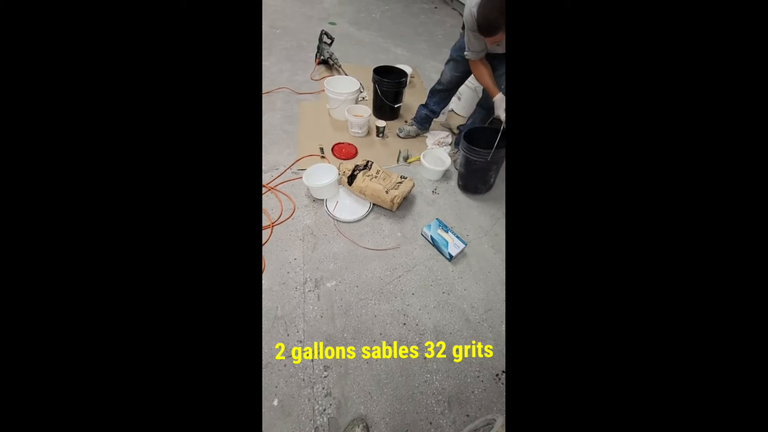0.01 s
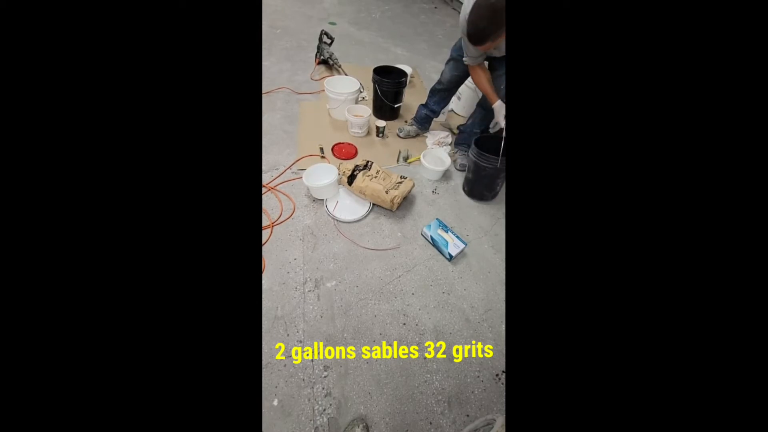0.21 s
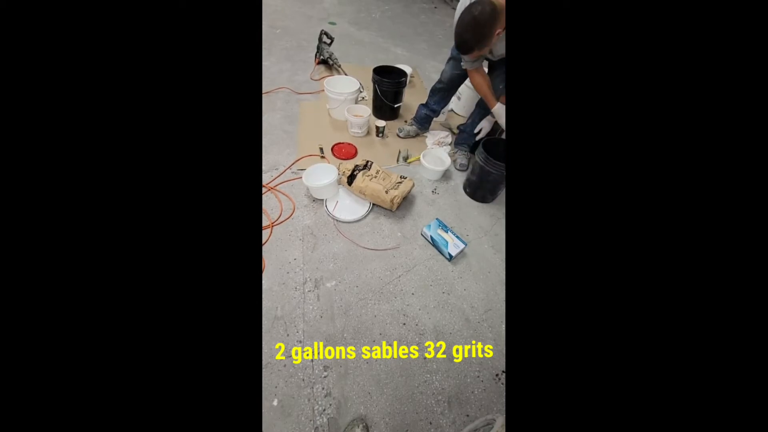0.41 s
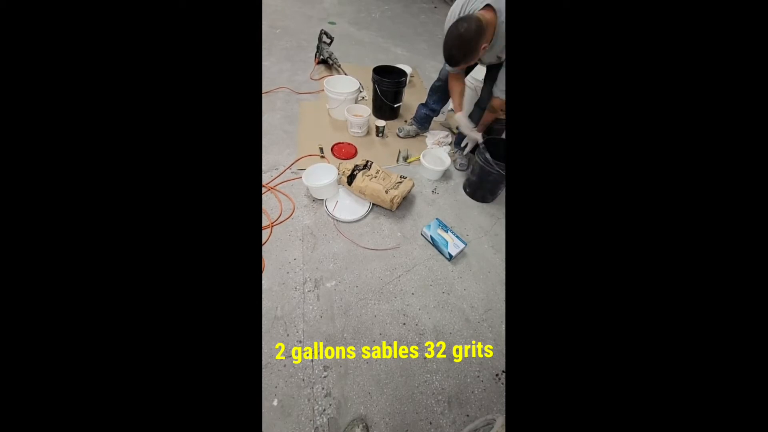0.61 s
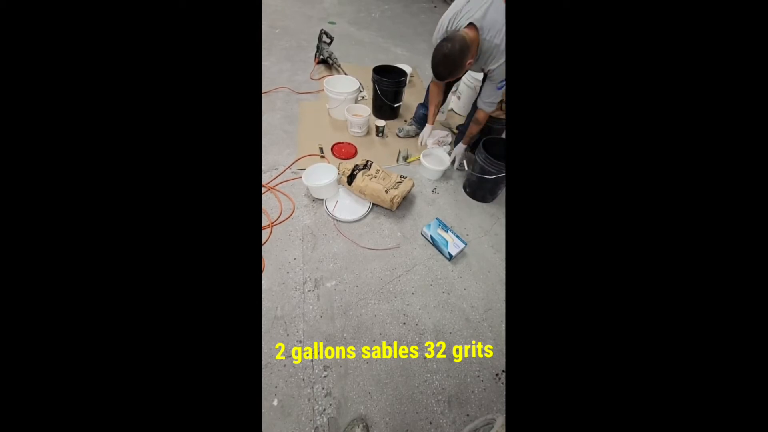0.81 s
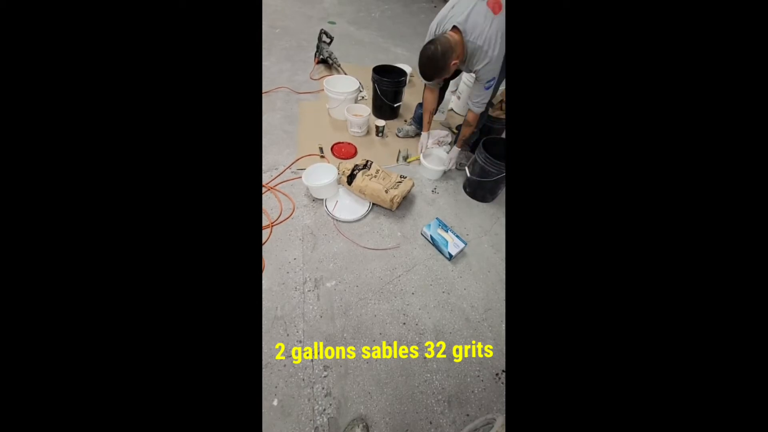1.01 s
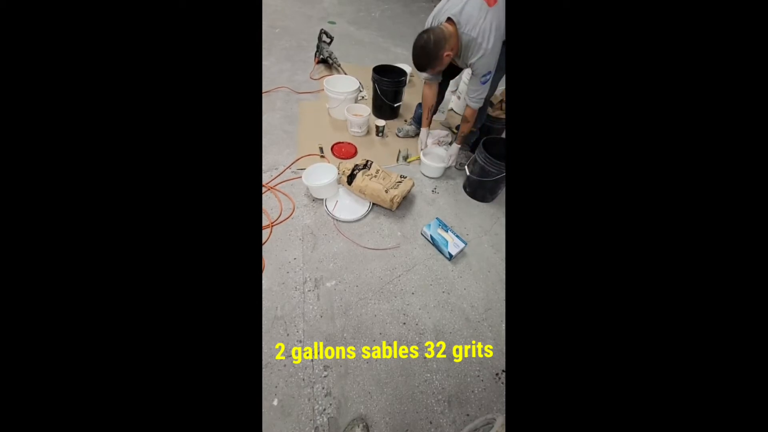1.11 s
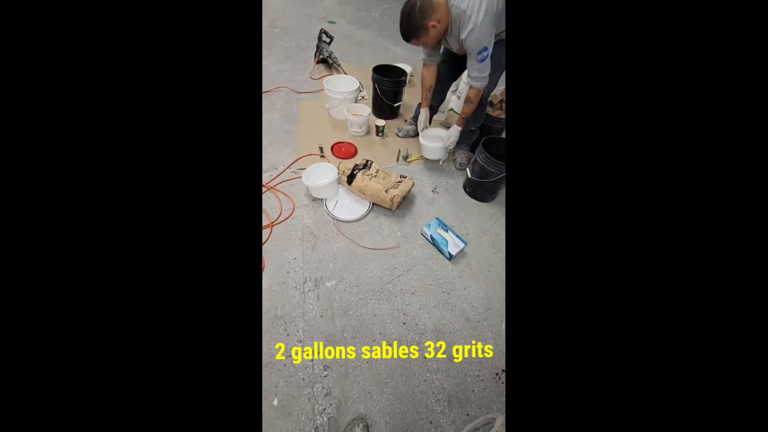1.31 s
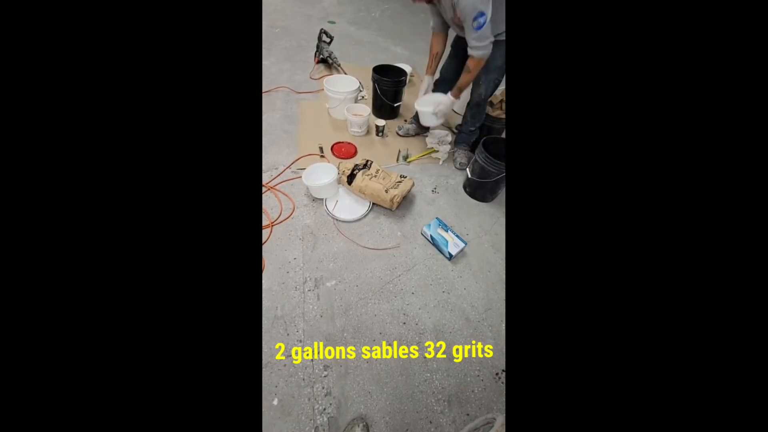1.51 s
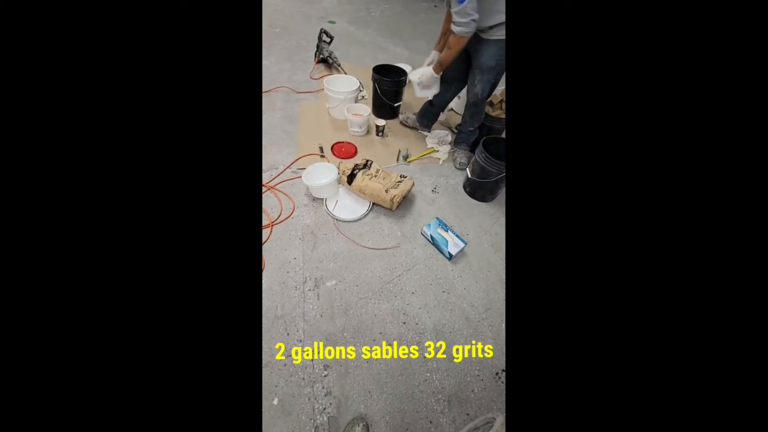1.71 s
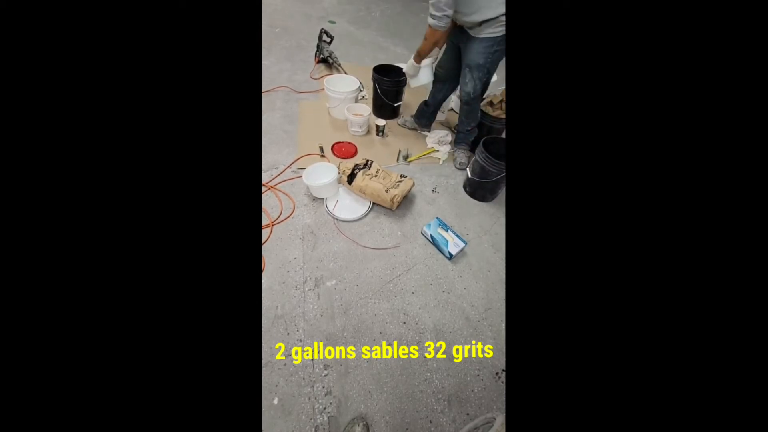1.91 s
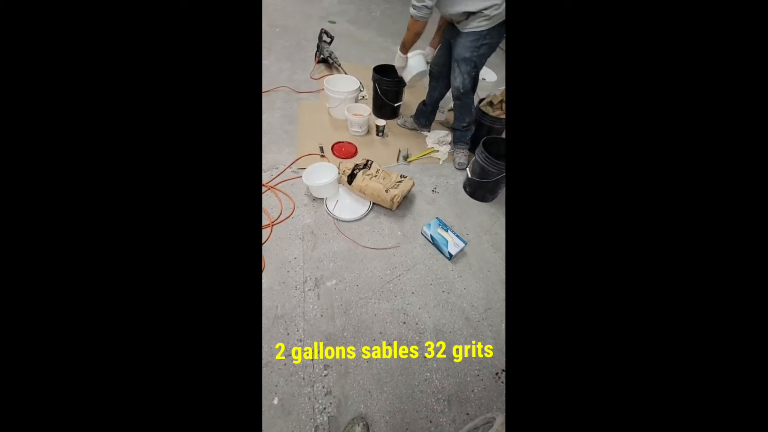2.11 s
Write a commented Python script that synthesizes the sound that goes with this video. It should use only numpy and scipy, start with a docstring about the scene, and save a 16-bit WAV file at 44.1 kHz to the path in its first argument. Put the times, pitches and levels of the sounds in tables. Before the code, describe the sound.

Plastic buckets knock and clack sharply on a concrete floor in an echoing bare workshop

```python
"""Buckets in an echoing workshop

Plastic buckets are handled on the concrete floor of a bare workshop. One is set down: decaying sine booms under
a rattle of shaped noise, with softer knocks as it rocks. Sharp clacks, as of a handle on a bucket wall, layer
noise bursts with ringing modes. A sandy rustle of filtered noise and soft step bursts follow, as of a tub
carried off. Echoes, lingering tub modes and a diffuse tail surround the impacts; steady low noise is the still
air."""
import sys
import numpy as np
from scipy import signal
from scipy.fft import rfft, irfft
from scipy.io import wavfile
from scipy.ndimage import uniform_filter1d, minimum_filter1d

SR = 44100
rng = np.random.default_rng(int(sys.argv[2]) if len(sys.argv) > 2 else 0)


def generate_wav(sig):
    """Save sig (samples, or channels by samples) to the path in sys.argv[1] as 16-bit PCM at SR."""
    pcm = np.round(np.clip(np.atleast_2d(sig).T, -1, 1) * 32767).astype(np.int16)
    wavfile.write(sys.argv[1], SR, pcm)


N = 97020  # samples, 2.2 s

# bucket meets floor: start_s, boom_db, pitch_hz, swell_s, wall_rattle_db
THUMPS = [(0.2132, -3.5, 233.5, 0.021, 16.5), (0.3713, -12.5, 225, .014, 6.5),
          (0.4590, -13, 212, 0.019, 10.5)]
# colour of the rattling bucket wall: freq_hz, level_db
WALL_COLOUR = [(40, -25.5), (100, -10.5), (170, 6.5), (290, 15), (400, 8), (650, 0), (1120, 4.5),
               (1600, -6.5), (2200, -17), (2900, -31.5), (6500, -34), (10000, -42), (15000, -34.5)]
BOOM_FALL_S, BOOM_ROOM_DB, BOOM_PAN_DB, BOOM_LAG_S = 0.002, -4, 1, -0.0001
PUSH_HZ, PUSH_DB, PUSH_PEAK_S = 93.3, -33.5, 0.018
WALL_FALL_S, WALL_RISE_S, WALL_ROOM_DB = 0.011, 0.00022, 0.5
THUMP_RIGHT_DB = 0.9  # right up, left down by this much


def thumps():
    """The bucket's bottom booms as it settles, its wall rattles, and it pushes air along the floor."""
    out = np.zeros((2, N))
    t = np.arange(SR // 5) / SR
    for start_s, boom_db, pitch_hz, swell_s, wall_db in THUMPS:
        swell = np.minimum(t / swell_s, 1)
        fall = np.exp(-np.maximum(t - swell_s, 0) / BOOM_FALL_S)
        boom = amp(boom_db) * swell * fall * np.sin(2 * np.pi * pitch_hz * t)
        push_shape = t / PUSH_PEAK_S * np.exp(1 - t / PUSH_PEAK_S)
        push = amp(PUSH_DB) * push_shape * np.sin(2 * np.pi * PUSH_HZ * t)
        rattle = amp(wall_db) * coloured(crunch(WALL_FALL_S, WALL_RISE_S), WALL_COLOUR)
        low = placed(boom + push, room_db=BOOM_ROOM_DB, pan_db=BOOM_PAN_DB, lag_s=BOOM_LAG_S)
        add(out, start_s, low)
        add(out, start_s, placed(rattle, room_db=WALL_ROOM_DB))
    return out * amp([[-THUMP_RIGHT_DB], [THUMP_RIGHT_DB]])


# handle clacks: start_s, body_db, hollow_db, ring_db, tick_db, fall_s, rise_s
CLACKS = [(0.37, -18, -15, -35, -9.5, 0.024, 0.0066), (0.408, -15, -13, -29, -9, .03, 0.03),
          (0.4696, 6, 8.5, -7, 7, 0.0057, 0.00059), (0.7896, 22, 16, 10.5, 20, 0.00167, 0.0012),
          (1.0759, 16.5, 8, -0.5, 14.5, 0.0047, .001), (1.2403, 6.5, 10.5, -17, 3.5, 0.0036, 0.00088),
          (1.3293, -2.5, 7, -22, -4.5, 0.0025, .0006), (1.58, -27, -11, -35, -17, 0.013, .003)]
# dull body of a clack: freq_hz, level_db
BODY_COLOUR = [(40, -36), (130, -2.5), (250, -2), (550, -0.5), (850, 3), (1280, 6), (1800, -3),
               (2400, -3.5), (3300, -5.5), (4200, -18), (15000, -57)]
# hollow voice of the plastic tub: freq_hz, level_db
HOLLOW_COLOUR = [(100, -41), (600, -16), (850, -5), (1120, 1.5), (1350, 2), (1580, 1.5), (1900, -14.5),
                 (4000, -41)]
# bright tick of a clack: freq_hz, level_db
TICK_COLOUR = [(100, -33), (2000, -4), (4000, -12), (6300, -13.5), (8000, -15.5), (10500, -17.5),
               (13000, -14.5), (15000, -21), (16000, -36)]
# ringing modes of the handle: freq_hz, level_db, t60_s
RING_MODES = [(2562, -37, 0.09), (2792, -9.5, 0.011), (2904, -15, 0.037), (2975, -20, 0.017),
              (3270, -69, 0.0083)]
BODY_DIRECT_DB, RING_DIRECT_DB, TICK_DIRECT_DB = -10, -15, -5.5
BODY_ECHO_DB, RING_ECHO_DB, TICK_ECHO_DB = -7.5, -6.5, -16.5
RING_ROOM_DB, RING_RISE_S, TICK_PAN_DB = -2.5, 0.0013, 3.5


def clacks():
    """Each clack is a bright tick, a hollow knock of plastic, a brief handle ring and lingering modes of the
    tub."""
    out = np.zeros((2, N))
    t = np.arange(SR // 10) / SR
    for start_s, body_db, hollow_db, ring_db, tick_db, fall_s, rise_s in CLACKS:
        dull = amp(body_db) * coloured(crunch(fall_s, rise_s), BODY_COLOUR)
        hollow = amp(hollow_db) * coloured(crunch(fall_s, rise_s), HOLLOW_COLOUR)
        tick = amp(tick_db) * coloured(crunch(fall_s, rise_s), TICK_COLOUR)
        ring = amp(ring_db) * modes(t, RING_MODES) * np.minimum(t / RING_RISE_S, 1)
        add(out, start_s, placed(dull + hollow, BODY_DIRECT_DB, echo_db=BODY_ECHO_DB))
        add(out, start_s, amp(hollow_db) * tub_linger())
        add(out, start_s, placed(ring, RING_DIRECT_DB, RING_ROOM_DB, RING_ECHO_DB))
        add(out, start_s, placed(tick, TICK_DIRECT_DB, echo_db=TICK_ECHO_DB, pan_db=TICK_PAN_DB))
    return out


# lingering modes of the plastic tub: freq_hz, level_db, t60_s
TUB_MODES = [(995, -55.5, 1), (1090, -52, .9), (1222, -59, .9), (1280, -53, 1), (1420, -55, 0.68),
             (1450, -65, 0.83), (2020, -71, .7), (2530, -59.5, 0.56), (3040, -51, 0.23), (3060, -62, 0.63)]
TUB_MODE_RISE_S = 0.011


def tub_linger():
    """The tub's faint lingering modes, reaching each channel with their own phase."""
    t = np.arange(SR) / SR
    return modes(t, TUB_MODES, random_phase=True) * np.minimum(t / TUB_MODE_RISE_S, 1)


def modes(t, table, random_phase=False):
    """Sum of decaying sines, each falling 60 dB in its t60; random phases make it two-channel."""
    total = 0
    for hz, db, t60_s in table:
        cycles = rng.random((2, 1)) if random_phase else 0
        decay = np.exp(-np.log(1000) * t / t60_s)
        total = total + amp(db) * decay * np.sin(2 * np.pi * (hz * t + cycles))
    return total


# soft steps and scuffs: start_s, level_db, fall_s
STEPS = [(1.926, -3.5, 0.0098), (1.951, -5.5, 0.038), (2.011, -12, 0.038)]
# colour of shoe on concrete: freq_hz, level_db
STEP_COLOUR = [(50, -14.5), (130, -4.5), (230, 11), (400, 4), (650, 1.5), (1100, -9), (1600, -21.5),
               (2500, -30), (7000, -32.5), (15000, -36.5)]
STEP_ROOM_DB, STEP_RISE_S = -3, 0.00053


def steps():
    """A shoe lands softly on concrete and scuffs: short bursts of dull noise."""
    out = np.zeros((2, N))
    for start_s, level_db, fall_s in STEPS:
        step = amp(level_db) * coloured(crunch(fall_s, STEP_RISE_S), STEP_COLOUR)
        add(out, start_s, placed(step, room_db=STEP_ROOM_DB))
    return out


# loudness curve of the sandy rustle: time_s, level_db
RUSTLE_LEVEL = [(0, -60), (.04, -61.5), (0.138, -78.5), (1.5, -83.5), (1.618, -61.5), (1.71, -56),
                (1.801, -63), (1.9, -68), (1.971, -65.5), (2.08, -65.5), (2.2, -64)]
# colour of the rustle: freq_hz, level_db
RUSTLE_COLOUR = [(200, -3.5), (900, -1), (2500, -0.5), (5500, -4), (9000, -10.5), (13500, -9.5),
                 (15500, -8)]


def rustle():
    """Faint dry hiss of sand and cloth shifting: noise riding a level curve."""
    level_db = np.interp(np.arange(N) / SR, *np.transpose(RUSTLE_LEVEL))
    return noise(RUSTLE_COLOUR, 400) * amp(level_db)


# colour of the workshop's still air: freq_hz, level_db
AIR_COLOUR = [(20, -12.5), (45, -10), (70, -1.5), (120, -3.5), (170, -14), (235, -1), (300, -10.5),
              (550, -11), (900, -18), (1400, -23), (2800, -29.5), (7000, -41.5), (15000, -48.5)]
AIR_DB = -51.5


def still_air():
    """Steady, mostly low noise of the workshop's air."""
    return amp(AIR_DB) * noise(AIR_COLOUR, 450)


# workshop reverberation: freq_hz, t60_s
ROOM = [(80, 0.85), (230, 1.25), (500, 1.35), (1200, 0.97), (2900, 0.97), (5000, 0.82), (8000, 0.57),
        (14000, 0.42)]
ROOM_GAP_S, ROOM_BUILD_S = 0.00067, 0.0085


def tail():
    """Diffuse two-channel reverberation of unit energy in the left channel, its bass nearly mono."""
    hz, t, z = signal.stft(rng.standard_normal((2, 3 * SR // 2)), SR, nperseg=512)
    # share of the left channel's noise in the right, by frequency
    same = np.clip(read([(150, 1.0), (280, 0.78), (500, 0)], hz), 0, 1)[:, None]
    right = same * z[0] + np.sqrt(1 - same ** 2) * z[1]
    decay = amp(-60 * t / read(ROOM, hz)[:, None])
    x = signal.istft(np.array([z[0], right]) * decay, SR, nperseg=512)[1]
    x = x * np.clip((np.arange(x.shape[1]) / SR - ROOM_GAP_S) / ROOM_BUILD_S, 0, 1)
    return x / np.linalg.norm(x[0])


# strong early reflections: delay_s, level_db, right_ear_lag_s
ECHOES = [(0.0127, 1, .0003), (.0240, 1, -0.0057), (.0300, 2.5, .0004)]
LAG_S = 0.00033  # right ear after left on the direct path


def placed(x, direct_db=0, room_db=0, echo_db=None, pan_db=0, lag_s=LAG_S):
    """A sound in the workshop: direct path, optional early reflections and tail; pan_db leans right."""
    out = amp(room_db) * signal.fftconvolve(x[None], tail(), axes=1)
    paths = [(0.00085, direct_db, lag_s)]
    if echo_db is not None:
        paths += [(delay_s, db + echo_db, lag) for delay_s, db, lag in ECHOES]
    for delay_s, db, lag in paths:
        add(out[0], delay_s, amp(db - pan_db) * x)
        add(out[1], delay_s + lag, amp(db + pan_db) * x)
    return out


def crunch(fall_s, rise_s, size=8192):
    """A gritty contact: a noise burst that swells and dies, with a nearly even spectrum and unit energy."""
    t = (np.arange(size) + 1) / SR
    fade = np.exp(-t / fall_s) * (1 - np.exp(-t / rise_s))
    x = rng.standard_normal(size)
    # alternate between shaping in time and flattening the spectrum
    for _ in range(3):
        z = rfft(x * fade)
        x = irfft(z / (abs(z) + 1e-12))
    x = x * np.sqrt(fade)
    return x / np.linalg.norm(x)


def coloured(x, points, size=4096):
    """Causal minimum-phase filter with the given spectrum."""
    log_gain = np.log(amp(read(points, abs(np.fft.fftfreq(size, 1 / SR)))))
    taps = np.fft.ifft(np.exp(np.conj(signal.hilbert(log_gain)))).real
    return signal.fftconvolve(x, taps[:size // 2])


def noise(points, same_below_hz):
    """Steady two-channel noise of unit rms, alike in both channels in the bass."""
    hz = np.fft.rfftfreq(N, 1 / SR)
    left, other = rfft(rng.standard_normal((2, N)))
    same = 1 / (1 + (hz / same_below_hz) ** 2)
    right = same * left + np.sqrt(1 - same ** 2) * other
    x = irfft(np.array([left, right]) * amp(read(points, hz)), N)
    return x / x.std()


def amp(db):
    """Decibels to gain."""
    return 10 ** (np.asarray(db) / 20)


def read(points, hz):
    """Reads a spectrum table on a log-frequency axis."""
    f, value = np.transpose(points)
    return np.interp(np.log(hz + 1), np.log(f), value)


def add(mix, start_s, sound):
    """Mixes a sound in at start_s, cut at the end of the mix."""
    part = mix[..., max(round(start_s * SR), 0):][..., :sound.shape[-1]]
    part += sound[..., :part.shape[-1]]


def scene():
    """Buckets, steps and rustle over the still air of the workshop."""
    return thumps() + clacks() + steps() + rustle() + still_air()


LIMIT_LEVEL, EDGE_HZ = 0.93, 15700


def record(dry):
    """A quick peak limiter shared by both channels, then a steep low-pass."""
    gain = np.minimum(1, LIMIT_LEVEL / (abs(dry).max(0) + 1e-9))
    # hold each dip for 129 samples, then smooth its edges
    limited = dry * uniform_filter1d(minimum_filter1d(gain, size=129), size=129)
    low_pass = signal.firwin(511, EDGE_HZ, window=("kaiser", 9), fs=SR)
    return signal.oaconvolve(limited, low_pass[None], "same")


dry = scene()
out = record(dry)
generate_wav(out)
```